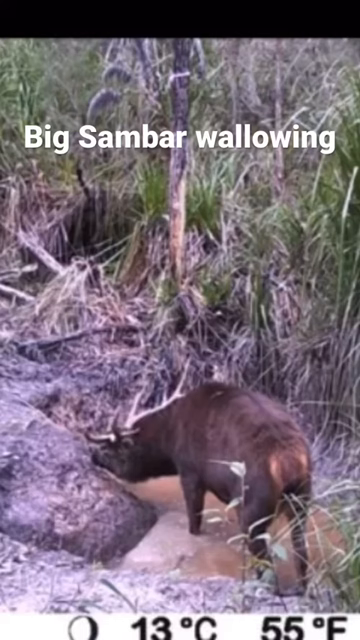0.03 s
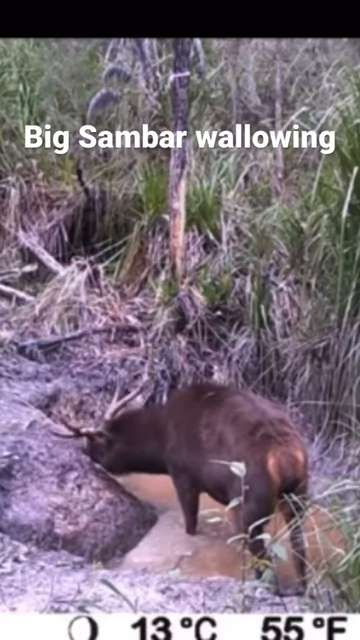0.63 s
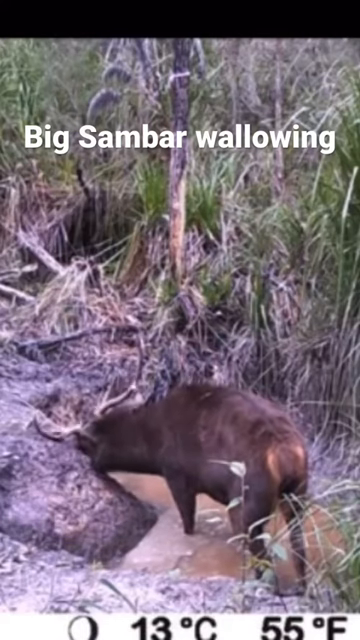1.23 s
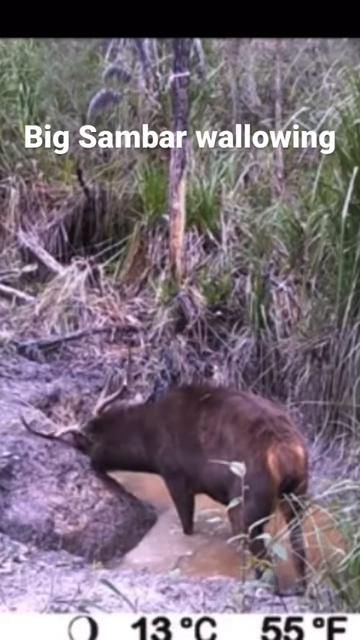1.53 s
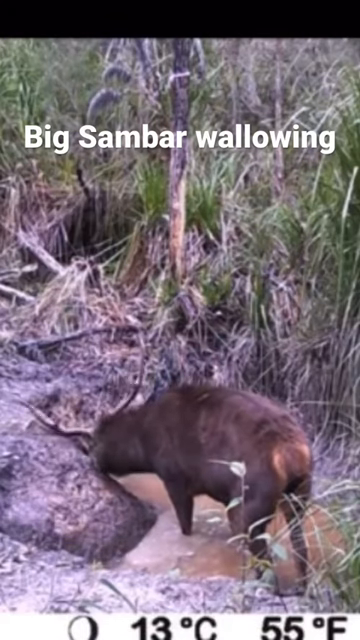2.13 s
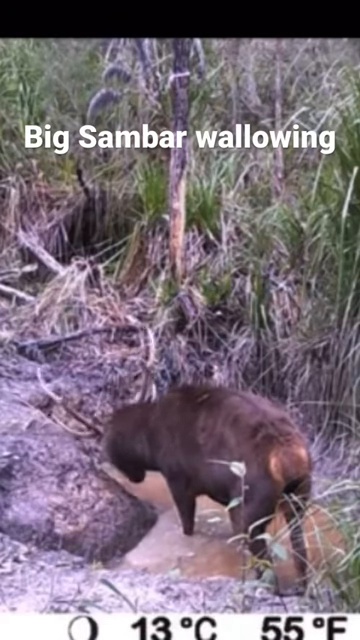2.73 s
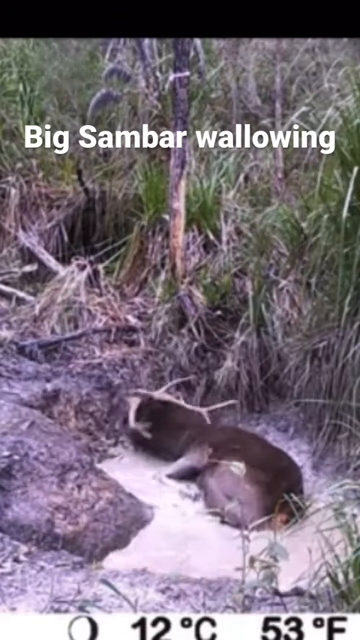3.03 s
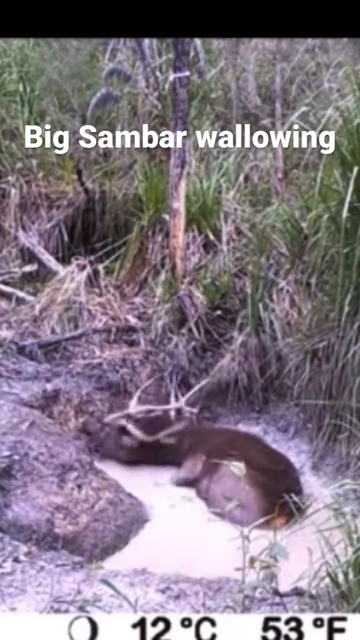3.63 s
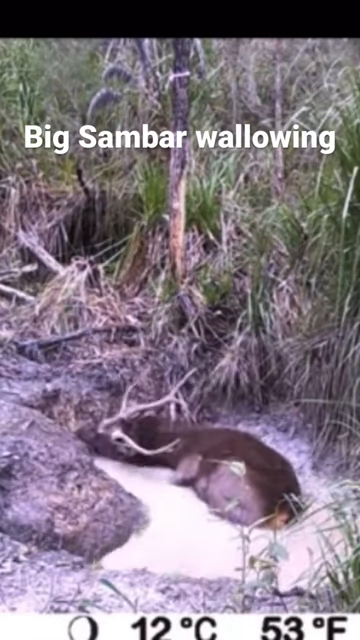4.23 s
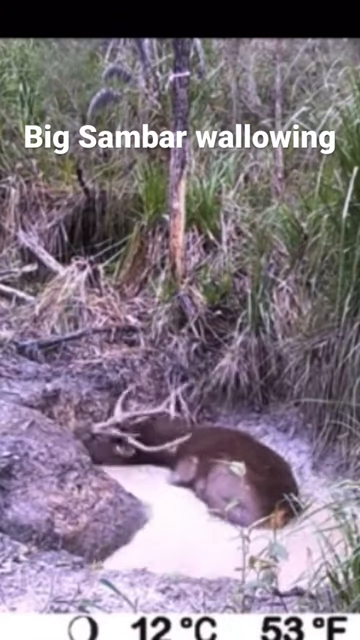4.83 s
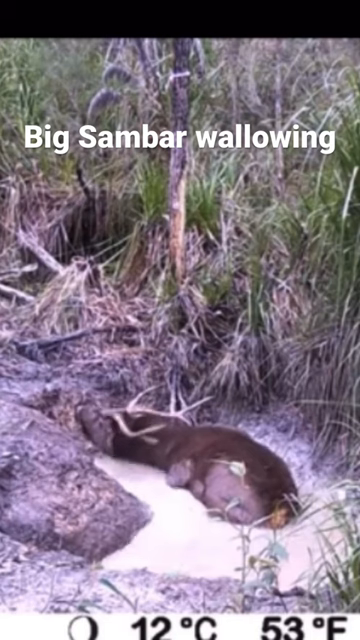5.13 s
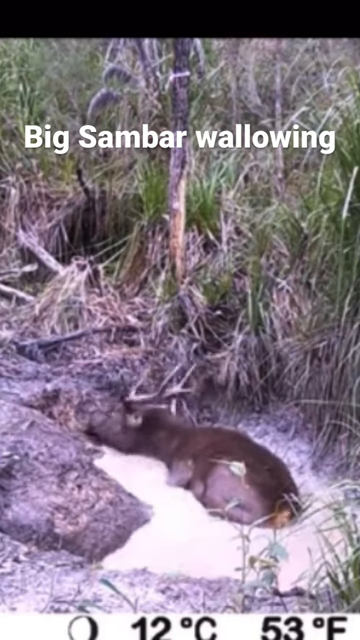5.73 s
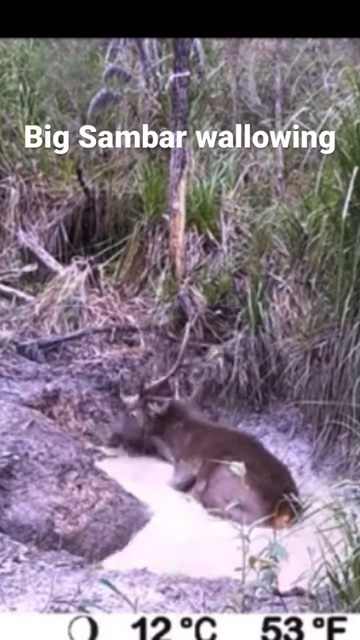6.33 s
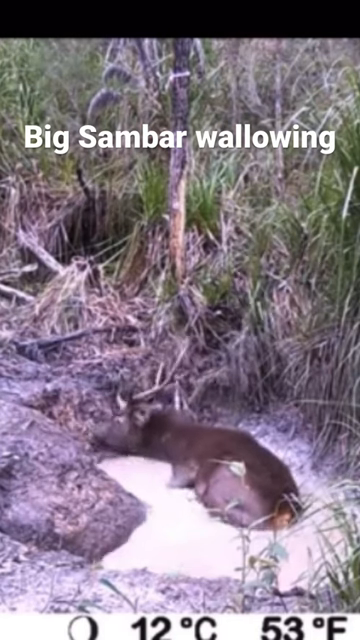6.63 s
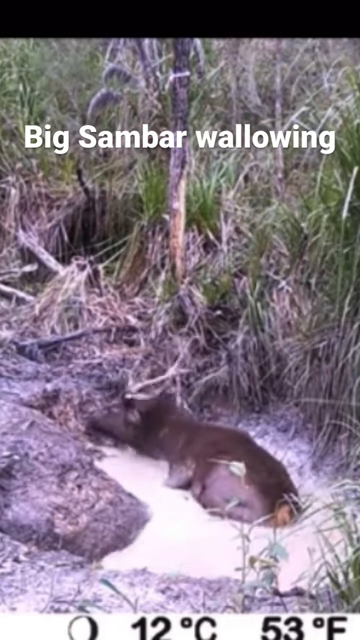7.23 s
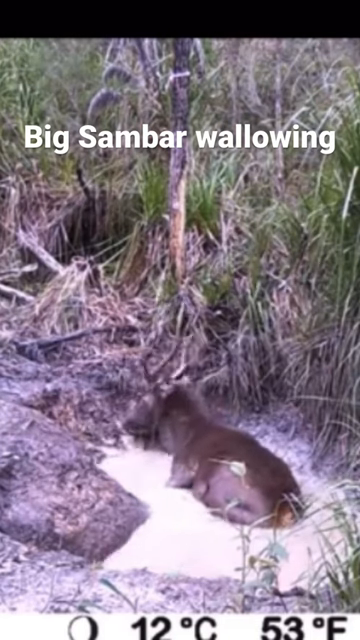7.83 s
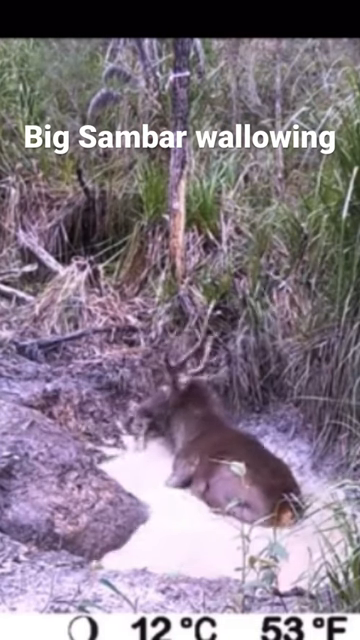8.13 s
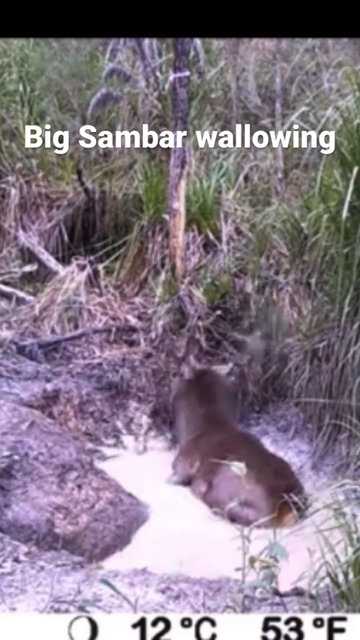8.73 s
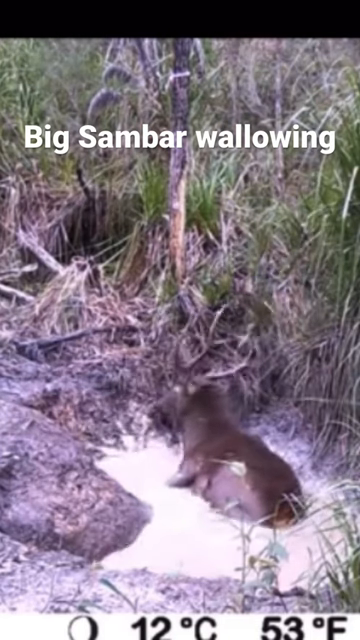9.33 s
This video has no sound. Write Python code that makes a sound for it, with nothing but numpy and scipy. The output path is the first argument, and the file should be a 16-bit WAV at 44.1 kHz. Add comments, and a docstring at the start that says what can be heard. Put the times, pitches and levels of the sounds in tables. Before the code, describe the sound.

A small outdoor microphone gives a steady low rumble and hiss. A few faint, distant birds chirp from about 1.8 seconds. At 2.8 seconds everything cuts out, returning at 3 seconds with a sharp, thumping click, by far the loudest sound. A deer then moves quietly in a muddy pool nearby. A hollow plop and wet smack come at 3.3 seconds, followed by soft squelches, light sloshing, drips and a brush of antlers through grass. The movement eases between 4.2 and 5.2 seconds, leaving faint bird whistles over the hiss. More plops and bubbles come around 5.3 to 5.5 seconds, tiny stalk snaps near 6, and a cluster of smacks and plops at 6.3. After a short lull, another plop sounds at 7.4. From 8.7 to 9.3 seconds the grass rustle and squelching grow busier, with a few last plops, then ease under the hiss.

```python
"""Stag in a mud wallow.

Heard through a trail camera's small microphone. Air pockets plop, mud films smack, water sloshes
and drips; antlers rake wet grass and snap stalks. Far birds whistle over the camera's steady hiss.
The camera stops once and restarts with a click."""
import sys
import numpy as np
from scipy import signal
from scipy.fft import rfft, irfft
from scipy.io import wavfile

SR = 44100
rng = np.random.default_rng(int(sys.argv[2]) if len(sys.argv) > 2 else 0)


def to_wav(sig):
    """Store sig (one row per channel, or 1-D mono) as 16-bit WAV at the path in sys.argv[1].

    Samples outside -1..1 are clipped; the rate is SR.
    """
    pcm = np.clip(np.atleast_2d(sig), -1, 1) * 32767
    pcm = np.round(pcm).astype(np.int16)
    wavfile.write(sys.argv[1], SR, pcm.T)  # frames by channels


N = 423360
TIME_S = np.arange(N) / SR
START_S, STOP_S, RESTART_S = .045, 2.812, 3.0218

# stag settles, lies still, rubs its neck, rests, thrashes: time_s, effort_db
EFFORT = [(3.05, -19), (3.28, -3), (3.55, -9.5), (3.88, -21.5), (4.75, -34), (5.3, -15), (6.0, -9.5),
          (6.55, -7), (6.88, -25.5), (7.68, -18), (7.85, -9.5), (8.68, -8), (8.8, 2.5), (9.26, 0),
          (9.48, -9)]
# antler strokes through grass: start_s, length_s, effort_db
STROKES = [(3.657, 0.022, -2), (4.03, 0.091, -12), (5.85, 0.066, -6), (6.05, 0.052, -2), (6.327, .06, 0),
           (6.435, 0.058, -1.5), (6.99, 0.064, -11), (7.095, .13, -11.5), (7.396, .04, -4.5),
           (7.606, 0.031, -8), (7.79, 0.06, -4), (7.917, 0.037, -2), (8.748, .22, -2.5), (9.042, 0.071, -1)]
# grass rustle, coloured by the microphone: freq_hz, density_db
GRASS_SPECTRUM = [(1200, -26.5), (1900, -3.5), (2600, -1), (3400, -13.5), (4500, -27), (5600, -19),
                  (6200, -15), (6600, -1), (7200, 3.5), (7700, -4), (8100, -26), (8500, -40)]
# mud squelch: freq_hz, density_db
SQUELCH_SPECTRUM = [(700, -18.5), (1400, -1.5), (1900, 4), (2500, 1), (3000, -11), (4000, -29)]
# water slosh: freq_hz, density_db
SLOSH_SPECTRUM = [(120, -5.5), (250, 1.5), (330, -2.5), (420, -1.5), (560, -7), (710, -4.5), (900, -11.5),
                  (1500, -26)]
# air pockets under the body: start_s, level_db, pitch_hz, t60_s, tilt_db_per_octave
POCKETS = [(3.265, -39, 396, 0.027, 1.5), (5.493, -38.5, 442, 0.027, 2), (6.324, -40, 407, .03, 1),
           (6.354, -44, 423, 0.041, -6), (7.416, -37, 390, 0.017, 1.5), (9.083, -42.5, 403, 0.037, -2),
           (9.118, -50.5, 400, 0.068, -1)]
# modes of each pocket: pitch_ratio, gain_db, t60_ratio
POCKET_MODES = [(.6, -8.5, 1.9), (1, 1.5, 0.78), (1.62, -10, 1)]
# bursting bubbles and brief thin tones: start_s, level_db, pitch_hz
BUBBLES_AND_TONES = [(3.244, -53, 1980), (3.307, -48.5, 686), (3.634, -62, 1590), (3.663, -57, 1490),
                     (3.69, -55, 700), (4.075, -54, 766), (5.275, -46, 604), (5.498, -45.5, 670),
                     (5.663, -51, 267), (5.873, -62, 2200), (6.195, -60.5, 1930), (6.354, -52.5, 900),
                     (6.639, -56.5, 402), (7.789, -62.5, 1790), (7.933, -61, 1840), (8.044, -65, 1940),
                     (8.189, -61, 1890), (8.791, -49.5, 326), (9.084, -59, 950)]
# tearing mud: start_s, level_db, centre_hz, decay_s
SMACKS = [(3.306, -41, 1820, 0.006), (3.385, -57.5, 2200, .012), (3.439, -52, 1710, 0.009),
          (3.478, -58, 2620, .009), (3.898, -56.5, 2010, 0.0037), (3.973, -56, 2350, .005),
          (4.041, -58, 2200, 0.0043), (4.072, -58.5, 2240, .009), (5.266, -52.5, 1700, 0.008),
          (5.447, -61, 2220, 0.046), (5.869, -61, 1550, 0.021), (6.096, -64, 2700, .011),
          (6.279, -54, 2200, 0.0085), (6.317, -47.5, 2130, 0.006), (6.353, -51.5, 1930, 0.015),
          (7.416, -53, 1970, 0.0052), (8.207, -61, 1860, .025), (9.046, -52, 2200, .009),
          (9.109, -60, 2160, 0.031), (9.227, -54, 2100, .013)]
# snapping stalks: start_s, level_db
SNAPS = [(3.308, -62), (3.595, -64), (3.672, -71), (3.768, -66), (4.076, -70), (4.792, -73), (5.874, -60),
         (6.092, -55), (7.412, -72), (8.763, -63)]
# bird call shapes: length_s, first_hz, last_hz, bend_exponent, rasp_hz
CHIRP_SHAPE = (0.056, 3350, 2570, 4, 15)
WHIP_SHAPE = (0.035, 3400, 1200, 1.2, 24)
RISE_SHAPE = (0.11, 4850, 7500, .55, 190)
# calls of each shape: start_s, level_db
CHIRPS = [(2.087, -78), (2.553, -79)]
WHIPS = [(1.843, -79), (2.289, -74)]
RISES = [(3.458, -90), (7.752, -86), (8.365, -87)]
# one-pitch bird calls: start_s, length_s, pitch_hz, level_db
PIPES = [(1.945, .075, 2040, -78), (2.404, .05, 2000, -76), (2.747, .028, 3080, -82.5),
         (4.405, 0.12, 2320, -83), (4.876, .04, 4100, -92), (4.984, 0.12, 2272, -76),
         (5.168, 0.018, 3030, -73)]
# camera rumble and hiss, faint treble hump: freq_hz, density_db
HISS_SPECTRUM = [(18, 5.5), (45, -6.5), (150, -17), (450, -26.5), (1000, -34), (2000, -41.5), (2700, -47),
                 (3400, -57), (4300, -67), (5800, -67), (7200, -56), (8500, -71), (12300, -72.5),
                 (14000, -81.5)]


def wallowing(blades_per_s=4500, drips_per_s=45):
    """Grass crackles, mud squelches, water laps and drips. Rates and levels hold at 0 dB effort."""
    effort = from_db(np.interp(TIME_S, *np.transpose(EFFORT)))
    stroke_power = antler_strokes()
    raking = np.sqrt(effort ** 2 + stroke_power)
    stirring = np.sqrt(effort ** 2 + stroke_power * from_db(-2) ** 2)
    blades = grains(per_s=blades_per_s * raking, spread_db=-1, clump_db=2, clump_hz=60)
    mud = grains(per_s=1400, spread_db=1.5, clump_db=4.5, clump_hz=32)
    water = grains(per_s=800, spread_db=.6, clump_db=3.5, clump_hz=14)
    grass = from_db(-72) * raking * colour(blades, GRASS_SPECTRUM)
    squelch = from_db(-76) * stirring ** .57 * colour(mud, SQUELCH_SPECTRUM)
    slosh = from_db(-68) * effort ** .3 * colour(water, SLOSH_SPECTRUM)
    dripping = from_db(-78) * np.sqrt(stirring) * drips(drips_per_s * np.sqrt(stirring))
    return (grass + squelch + slosh + dripping) * (TIME_S > RESTART_S)


def antler_strokes(attack_s=.016, release_s=.012):
    """Power envelope: each stroke swells, holds, decays."""
    power = np.zeros(N)
    for start_s, length_s, effort_db in STROKES:
        swell = np.clip((TIME_S - start_s) / attack_s, 0, 1)
        release = np.exp(-np.maximum(TIME_S - start_s - length_s, 0) / release_s)
        power += (from_db(effort_db) * swell * release) ** 2
    return power


def plops(pitch_rise=.028, attack_s=.0016, splat_db=-11, t60_at_1khz_s=.032):
    """Air pockets, bubbles and brief thin tones ring, rising in pitch, each with a muddy splat."""
    out, t = np.zeros(N), TIME_S[:SR // 6]
    rings = [(start_s, level_db + gain_db + tilt * np.log2(ratio), hz * ratio, t60_s * t60_ratio)
             for start_s, level_db, hz, t60_s, tilt in POCKETS
             for ratio, gain_db, t60_ratio in POCKET_MODES]
    for start_s, level_db, hz in BUBBLES_AND_TONES:
        rings.append((start_s, level_db, hz, t60_at_1khz_s / (hz / 1000) ** .14))
    for start_s, level_db, hz, t60_s in rings:
        glide_hz = hz * (1 + pitch_rise * np.minimum(t / t60_s, 1))
        ring = np.sin(2 * np.pi * np.cumsum(glide_hz) / SR)
        band = resonate(rng.standard_normal(len(t)), hz, width_hz=hz)
        splat = from_db(splat_db) * rms_one(low_pass(band, 1.3 * hz, order=4))
        envelope = from_db(level_db + 5 - 60 * t / t60_s) * (1 - np.exp(-t / attack_s))
        add(out, start_s, envelope * (ring + splat))
    return out


def smacks(width_hz=600, top_hz=2650, rough_db=5, attack_s=.0007):
    """A mud film tears in a quick run of tiny pops."""
    out, t = np.zeros(N), TIME_S[:SR // 6]
    for start_s, level_db, centre_hz, decay_s in SMACKS:
        bursts = rng.standard_normal(len(t)) * from_db(rough_db * rng.standard_normal(len(t)))
        tear = rms_one(low_pass(resonate(bursts, centre_hz, width_hz), top_hz, order=10))
        envelope = (1 - np.exp(-t / attack_s)) * np.exp(-(t / decay_s) ** 2)
        add(out, start_s, from_db(level_db - 8) * envelope * tear)
    return out


def snaps(ring_hz=7050, width_hz=700, t60_s=.017):
    """Breaking stalks excite the microphone's treble resonance."""
    out, t = np.zeros(N), TIME_S[:SR // 12]
    for start_s, level_db in SNAPS:
        crack = rng.standard_normal(len(t)) * from_db(-60 * t / t60_s)
        ring = resonate(resonate(crack, ring_hz, width_hz), ring_hz, 2 * width_hz)
        add(out, start_s, from_db(level_db) * ring / np.abs(ring).max())
    return out


def drips(per_s, low_hz=1407, high_hz=2494, pitches=9):
    """Drops hit the pool at random, each ringing on one of a few pitches; rms 1."""
    out = np.zeros(N)
    for hz in np.geomspace(low_hz, high_hz, pitches):
        impacts = grains(per_s=per_s / pitches, spread_db=.5, clump_db=1, clump_hz=10)
        out += resonate(impacts + 1e-18, hz, width_hz=70)
    return rms_one(out)


def birds():
    """Three birds repeat their own glides; others pipe on one pitch."""
    out = np.zeros(N)
    for shape, calls in ((CHIRP_SHAPE, CHIRPS), (WHIP_SHAPE, WHIPS), (RISE_SHAPE, RISES)):
        for start_s, level_db in calls:
            add(out, start_s, from_db(level_db) * whistle(*shape))
    for start_s, length_s, hz, level_db in PIPES:
        add(out, start_s, from_db(level_db) * whistle(length_s, hz, hz, bend=1, rasp_hz=45))
    return out


def whistle(length_s, first_hz, last_hz, bend, rasp_hz, flutter_db=2.5):
    """Sine glide, raspy from pitch and level flutter. Bend over 1 glides early, under 1 late."""
    progress = np.linspace(0, 1, int(length_s * SR))
    glide_hz = last_hz + (first_hz - last_hz) * (1 - progress) ** bend
    jitter_hz = rasp_hz * drift(rate_hz=400)[:len(progress)]
    flutter = from_db(flutter_db * drift(rate_hz=70)[:len(progress)])
    envelope = np.sqrt(np.abs(np.sin(np.pi * progress)))
    return envelope * flutter * np.sin(2 * np.pi * np.cumsum(glide_hz + jitter_hz) / SR)


def bush(x, wet_db, t60_s, delay_s=.008):
    """Trunks and leaves scatter a diffuse tail."""
    t = TIME_S[:SR]
    tail = rng.standard_normal(SR) * from_db(-60 * t / t60_s) * (t > delay_s)
    return x + from_db(wet_db) * signal.fftconvolve(x, tail / np.linalg.norm(tail))[:N]


def hiss(level_db=-53.5):
    """Camera self-noise."""
    return from_db(level_db) * colour(rng.standard_normal(N), HISS_SPECTRUM)


def grains(per_s, spread_db, clump_db, clump_hz):
    """Random impulses, uneven in size, swelling in clumps; equal power at any density."""
    hits = rng.random(N) < per_s / SR
    sizes = from_db(spread_db * np.minimum(rng.exponential(1, N), 4))
    signs = rng.choice([-1, 1], N)
    return hits * sizes * signs * from_db(clump_db * drift(clump_hz)) / np.sqrt(per_s)


def drift(rate_hz):
    """Linear ramps between random values; rms 1."""
    knots = rng.standard_normal(N // 100)
    return rms_one(np.interp(TIME_S * rate_hz, np.arange(len(knots)), knots))


def colour(x, spectrum, skirt_db_per_octave=36):
    """Apply a spectrum, rolled off beyond its ends; rms 1."""
    freq_hz, density_db = np.transpose(spectrum)
    octave = np.log2(np.maximum(np.arange(N // 2 + 1) * SR / N, 1))
    knots = np.log2(freq_hz)
    octaves_outside = np.abs(octave - np.clip(octave, knots.min(), knots.max()))
    gain_db = np.interp(octave, knots, density_db) - skirt_db_per_octave * octaves_outside
    return rms_one(irfft(rfft(x) * from_db(gain_db), N))


def resonate(x, hz, width_hz):
    """Two-pole resonator, unit peak gain."""
    radius = np.exp(-np.pi * width_hz / SR)
    feedback = [1, -2 * radius * np.cos(2 * np.pi * hz / SR), radius ** 2]
    return signal.lfilter(np.array([1, 0, -1]) * (1 - radius ** 2) / 2, feedback, x)


def low_pass(x, hz, order):
    """Butterworth low-pass."""
    return signal.sosfilt(signal.butter(order, hz, fs=SR, output="sos"), x)


def add(out, start_s, sound):
    """Mix in at start_s."""
    at = round(start_s * SR)
    out[at:at + len(sound)] += sound[:N - at]


def rms_one(x):
    """Scale to unit rms."""
    return x / np.sqrt(np.mean(x ** 2) + 1e-20)


def from_db(db):
    """Decibels to gain."""
    return 10 ** (np.asarray(db) / 20)


def scene():
    """Stag near, birds far, hiss over all; mono."""
    stag = wallowing() + bush(plops() + smacks() + snaps(), wet_db=-8.5, t60_s=.099)
    far_birds = bush(birds(), wet_db=-2, t60_s=.36)
    heard = low_pass(stag + far_birds, hz=8100, order=16)
    return (heard + hiss())[None]


def record(dry, fade_s=.041, step_db=-16.5, settle_s=.12, cutoff_hz=16500):
    """The camera fades in, stops, and restarts with a voltage step that drains away."""
    fade_in = np.clip((TIME_S - START_S) / fade_s, 0, 1)
    restarted = TIME_S > RESTART_S
    running = (TIME_S < STOP_S) | restarted
    step = from_db(step_db) * restarted * np.exp(-np.abs(TIME_S - RESTART_S) / settle_s)
    band_limit = signal.cheby2(16, 60, cutoff_hz, fs=SR, output="sos")
    return signal.sosfilt(band_limit, dry * fade_in * running + step)


dry = scene()
out = record(dry)
to_wav(out)
```